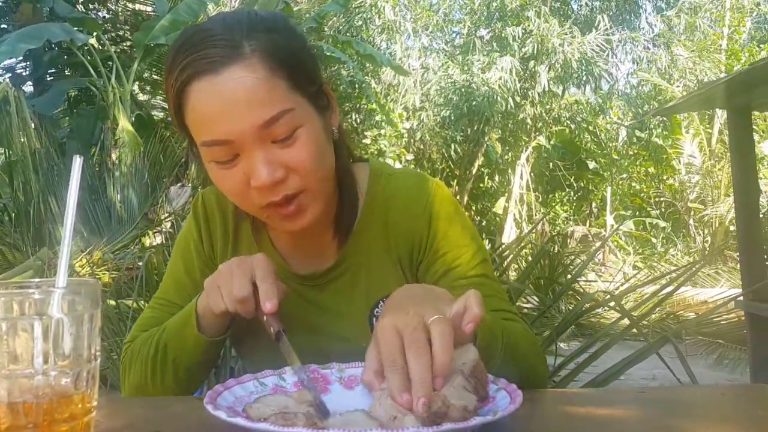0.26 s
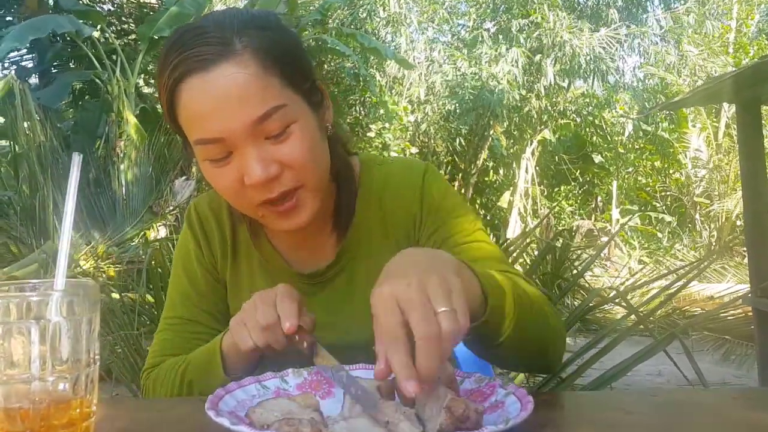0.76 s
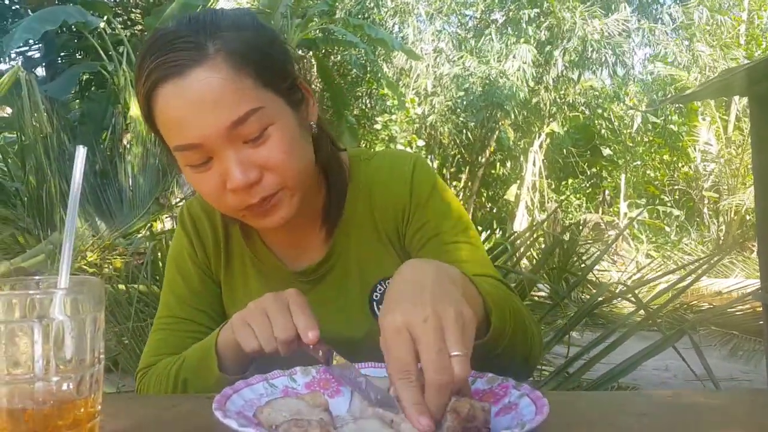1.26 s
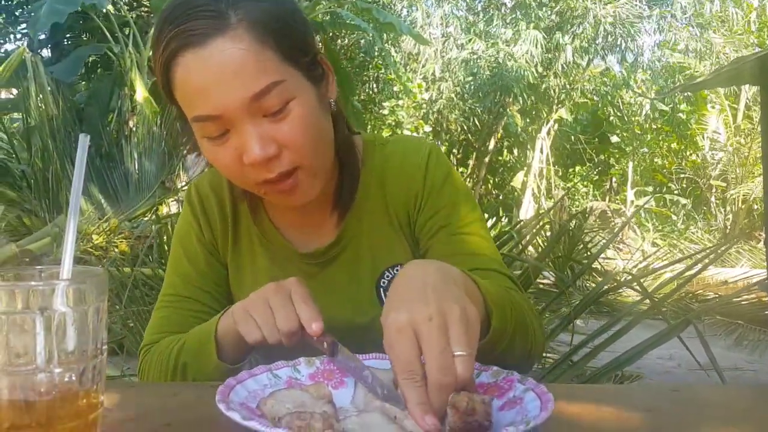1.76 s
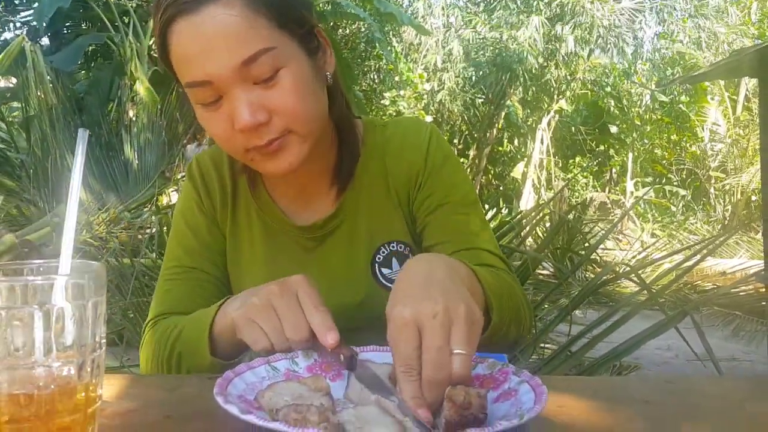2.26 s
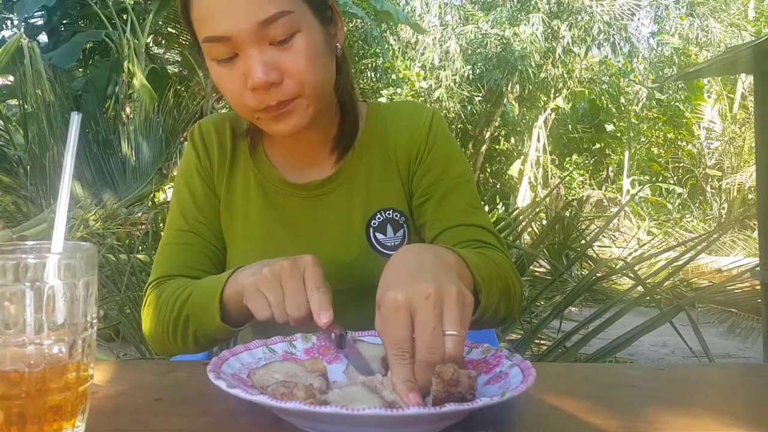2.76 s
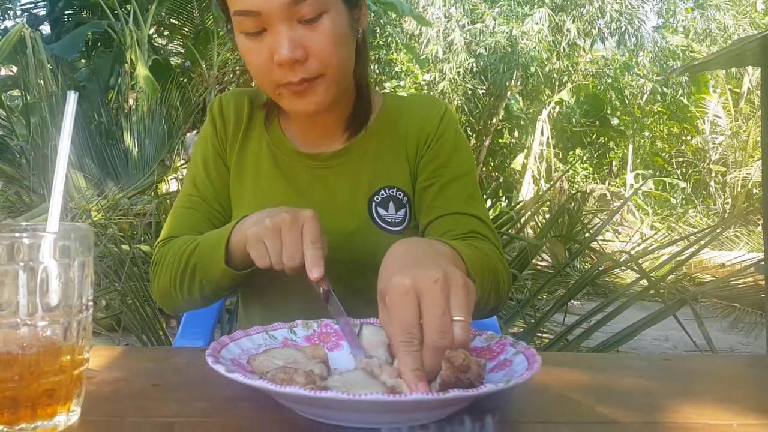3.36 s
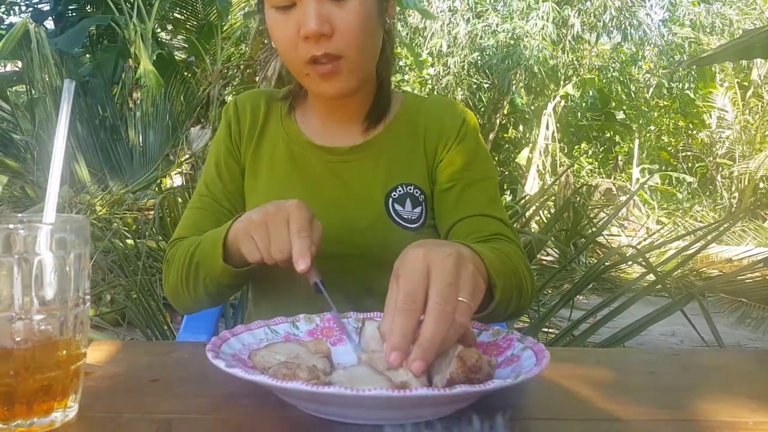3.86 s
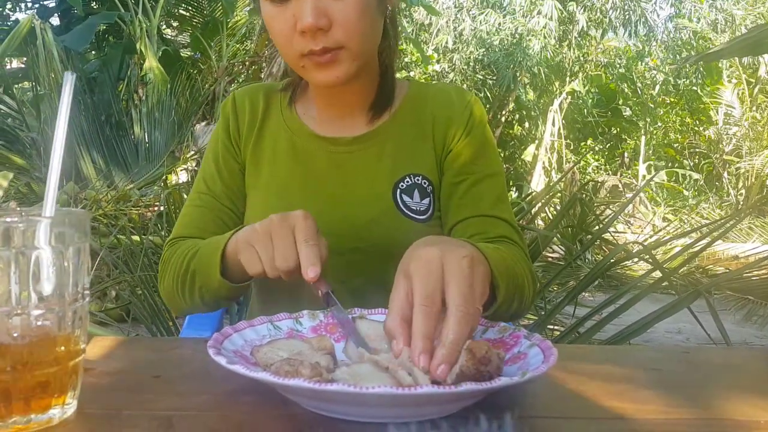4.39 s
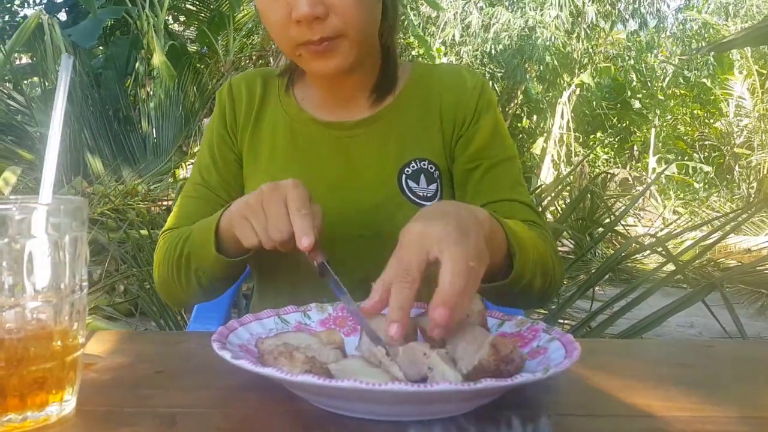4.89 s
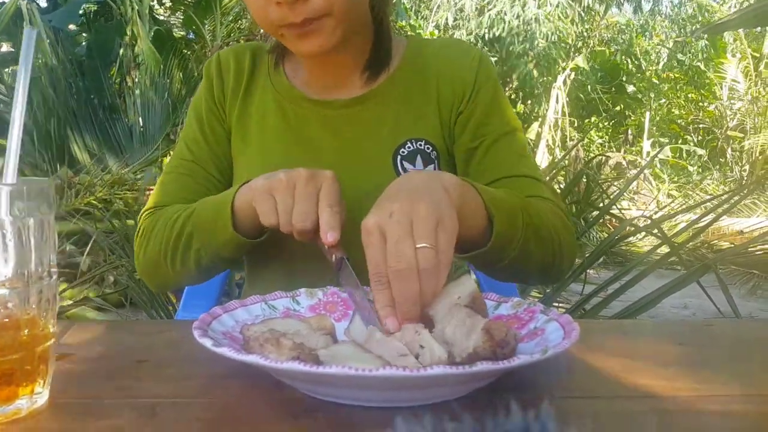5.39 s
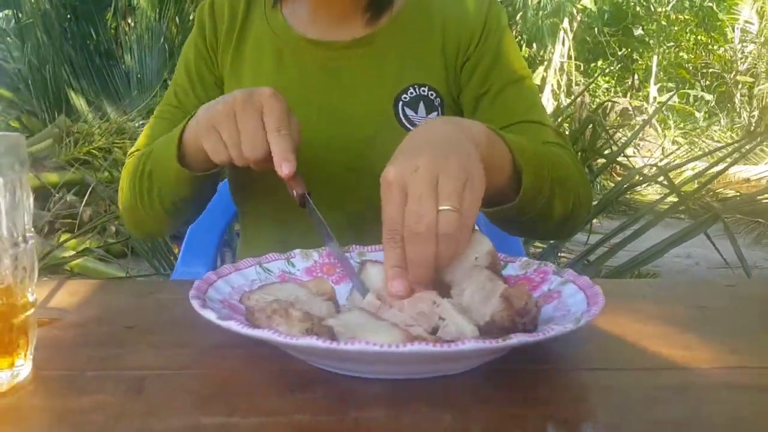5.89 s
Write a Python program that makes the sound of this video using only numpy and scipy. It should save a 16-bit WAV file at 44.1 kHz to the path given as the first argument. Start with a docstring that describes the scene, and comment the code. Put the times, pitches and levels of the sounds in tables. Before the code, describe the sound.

A table knife clicks and scrapes on a plate while cutting meat, the plate knocking on a wooden table in a quiet garden.

```python
"""A steady hush of leaves and far-off noise in a garden; then, close by, a table knife saws through
cooked meat on a light plate. The blade ticks on the plate, and each blow knocks the plate against the
wooden table. Between blows the serrated edge scrapes the glaze and the plate rumbles.
A stereo microphone near the table picks it up, with two short echoes from nearby surfaces."""
import sys
import numpy as np
from scipy import signal
from scipy.fft import rfft, irfft, next_fast_len
from scipy.io import wavfile

SR = 44100
rng = np.random.default_rng(int(sys.argv[2]) if len(sys.argv) > 2 else 0)


def inscribe(sig):
    """Save sig as 16-bit PCM at rate SR to the path in sys.argv[1].

    A 1-D sig is mono; a 2-D sig holds one channel per row.
    Samples are clipped to [-1, 1] before scaling.
    """
    pcm = np.round(np.clip(np.atleast_2d(sig).T, -1, 1) * 32767)
    wavfile.write(sys.argv[1], SR, pcm.astype(np.int16))


N = 270862

# Spectrum of the leaves and far-off noise: frequency_hz, relative_density_db
GARDEN_SPECTRUM = [(25, -28), (60, -1), (97, -3.5), (250, -5.5), (600, -8), (1600, -14.5), (3400, -20),
                   (4300, -25), (5200, -42), (7000, -36), (10000, -36), (12000, -33), (13500, -44.5),
                   (15000, -58.5), (16000, -75)]
# How alike the garden is on left and right: frequency_hz, correlation
GARDEN_LIKENESS = [(60, 1), (180, 1.0), (550, 0.99), (1650, 0.99), (4970, 0.98), (15000, 0.89)]
# Strokes of the edge across the glaze: start_s, length_s, scrape_start_db, scrape_end_db,
# treble_share_db, shake_start_db, shake_end_db, knock_over_rocking_db
STROKES = [(0.08, 0.074, -61, -62, -24, -70, -66, 12), (0.387, 0.045, -37.5, -40.5, -17.5, -25, -32.5, 1),
           (0.43, 0.11, -50, -67.5, -22, -41, -54, -3.5), (2.428, 0.049, -46, -54, -20, -42, -41, 9),
           (2.627, 0.021, -43.5, -40, -25.5, -30, -22, -9), (2.74, 0.062, -36, -75, -23, -25, -38.5, -6),
           (2.827, 0.035, -50.5, -47.5, -21.5, -18, -45, -5.5),
           (2.873, 0.04, -43.5, -55, -19.5, -25, -36.5, -3.5), (2.915, 0.02, -62, -72, -31, -38.5, -40, -9),
           (3.109, 0.048, -51, -55, -19.5, -39, -78, -5), (3.297, 0.081, -59, -55.5, -20, -48, -42, -4.5),
           (3.384, 0.042, -55, -58, -21, -33, -43.5, -7), (3.428, 0.058, -54, -49, -21, -46, -38, -10),
           (3.501, 0.1, -47, -62.5, -20.5, -42, -47.5, -1), (4.509, 0.031, -53, -55, -14, -56, -59, -19),
           (4.565, 0.025, -46.5, -60.5, -20, -41, -50, -11), (4.6, 0.012, -66, -78, -9, -52, -57, -20),
           (4.641, 0.076, -60.5, -63, -28, -67.5, -65, 13), (5.376, 0.022, -53, -55, -21, -49, -50, 1),
           (5.417, 0.065, -55.5, -55, -15, -47, -38.5, -5.5), (5.542, 0.12, -63, -49, -14.5, -47, -50, -25),
           (5.682, 0.09, -49.5, -48.5, -18.5, -36, -49, -22), (5.768, 0.04, -48, -58, -23, -23, -49, -18),
           (5.812, 0.032, -55.5, -48, -22.5, -30.5, -28.5, -9),
           (5.911, 0.028, -62.5, -66.5, -20, -33, -44, -12),
           (5.953, 0.038, -57, -47, -20, -42.5, -44.5, -8.5)]
# Pressure of the cut through the meat, heard as rumble and rub: time_s, level_db
CUT_PRESSURE = [(0.361, -80), (0.45, -57.5), (0.62, -75), (2.0, -87), (2.158, -56), (2.57, -51.5),
                (2.8, -45.5), (3.1, -49.5), (3.46, -51.5), (3.62, -60), (4.06, -60.5), (4.25, -85),
                (4.45, -66), (4.839, -59), (4.97, -88), (5.301, -73), (5.54, -47), (5.79, -47.5),
                (5.919, -60), (6.0, -56.5), (6.14, -62.5)]
# Plate ringing under the edge: pitch_hz, level_db, t60_s
RIM_MODES = [(915, -7.5, 0.02), (1100, -6.5, 0.028), (1338.6, -1, 0.014), (1639, 0.5, 0.018),
             (1823, -1.5, 0.022), (2146, -3.5, 0.016), (2579, -8.5, 0.024), (3120, -6, 0.016),
             (3463, -6, 0.014), (3925, -16, 0.019)]
# The blade's own ring: pitch_hz, level_db, t60_s
BLADE_MODES = [(4830, 0.5, 0.012), (5850, -4, .012), (7200, -4.5, .008), (8450, -2, .008),
               (9530, -1.5, .007), (11360, -1, .006), (12600, -5, 0.006)]
# Plate rocking on the table; neighbours start opposed and swell as they beat: pitch_hz, level_db, t60_s
ROCKING_MODES = [(357.6, -1, 0.1), (384, 2, 0.16), (414.8, 2, 0.1), (445.2, -1, 0.089)]
# Plate knocking on the table: pitch_hz, level_db, t60_s
KNOCK_MODES = [(199.4, -14.5, 0.15), (505, -3, 0.064), (567.4, -6.5, 0.17), (613.3, 1.5, 0.044),
               (653, 5, 0.041), (791, -11.5, .07)]
# Thud of the wooden table top: pitch_hz, level_db, t60_s
TABLE_MODES = [(93, -7.5, 0.28), (118.2, -3, 0.1), (160, -3.5, 0.053), (297, -0.5, 0.06)]
# Blade meets plate: start_s, tick_peak_db, blade_peak_db, rocking_db, knock_db, thud_db,
# tick_centre_hz, chatter_ms, off_centre_loss_db
BLOWS = [(0.3655, -4, -19, -44, -16.5, -41, 2146, 7.2, 5.5),
         (0.3695, -13, -42, -51, -19.5, -30, 2146, 5, 16),
         (0.3745, -9, -42.5, -26, -18, -50, 2146, 3.3, 21),
         (0.434, -45, -39.5, -40, -57, -55, 2150, 6.1, 18),
         (1.074, -48, -74.5, -90.5, -80, -66.5, 1446, 5.5, 19),
         (1.2653, -40, -82.5, -29, -29.5, -44.5, 1230, 5.4, 5),
         (1.3286, -58.5, -79.5, -34, -38.5, -52, 1550, 4.8, 9.5),
         (1.8208, -40.5, -55, -89.5, -78.5, -78.5, 3164, 4, 16.5),
         (1.836, -50, -60, -86, -72, -68.5, 1640, 3.7, 0.5),
         (2.33, -72, -52.5, -50, -49, -51.5, 1310, 5.0, 1),
         (2.398, -40.5, -42, -41.5, -49, -52, 3120, 2.6, 10),
         (2.4264, -14, -45, -26, -20.5, -33, 2260, 5.2, 18), (2.6205, -56, -64, -45, -36, -60, 1790, 6, 7),
         (2.7252, -16, -39.5, -22.5, -22, -54, 1837, 3.9, 2.5),
         (2.7313, -22, -55, -30.5, -25, -27, 2055, 8.5, 14),
         (2.8439, -36, -50, -30.5, -23, -51, 1640, 3.4, -2),
         (3.088, -15, -41.5, -41.5, -34, -61, 1880, 0.92, 7.5),
         (3.2772, -43.5, -60, -73, -75, -74, 2890, 5.2, 13),
         (3.3536, -23.5, -47, -25.5, -29.5, -69, 2620, 2.1, 0),
         (3.3653, -27, -50, -38.5, -37, -56, 1450, 5.9, 2.5),
         (3.4908, -30.5, -58, -30, -32, -63, 1484, 5.5, -3),
         (3.7542, -40, -80, -31, -46, -45, 1480, 6.4, -2.5),
         (3.798, -41.5, -73, -36.5, -37, -51, 1670, 7.1, 5),
         (3.8871, -29.5, -50, -37.5, -37, -74, 2348, 9.1, 7),
         (3.984, -68, -54, -77, -75.5, -56.5, 1457, 1.5, 14.5),
         (4.5025, -36, -67, -65, -54.5, -72, 2027, 4.0, 18),
         (4.508, -36.5, -51, -48, -70, -54, 2020, 4.9, 12.5),
         (4.5156, -34, -58, -53, -72, -65, 2230, 2.1, 5), (4.5322, -36, -60, -61, -50, -68, 2700, 3.0, 8.5),
         (4.5362, -35, -58, -43.5, -59, -59, 2300, 3.4, 6),
         (4.5573, -38, -59, -43.5, -56, -66, 1960, 7.3, 4),
         (4.6684, -46.5, -67, -75, -65, -86, 1620, 13, 15),
         (5.3615, -34.5, -68, -38, -50, -70, 1910, 3.3, 2.5),
         (5.755, -22.5, -50.5, -26, -27, -74, 1400, 7.9, 7.5),
         (5.8294, -31, -60.5, -20, -29, -31.5, 1254, 2.9, 3),
         (5.8568, -55.5, -67, -28, -58, -34.5, 1140, 5.0, 19),
         (5.891, -37.5, -56, -26.5, -43.5, -61, 1920, 3.6, 5)]
# Echoes from surfaces near the table: delay_s, level_db
ECHOES = [(.003, -20), (.008, -19)]
# Level between the microphone's two ports: frequency_hz, left_minus_right_db
PORT_BALANCE = [(125, 0), (500, -.6), (1200, -.1), (2500, -.3), (3500, -3), (5000, -9.5), (6500, -5),
                (9000, 5.5), (12000, 1)]
# Phase between the ports: frequency_hz, left_lead_rad
PORT_PHASE = [(3000, -0.022), (4500, 0.11), (6000, .1), (7500, -.1), (10000, .05)]

GARDEN_RMS_DB = -61
BITE_DB_PER_S, RELEASE_DB_PER_S = 1499, 899
RUB_DB, RUB_FOLLOWS, RUB_TREBLE_DB = -61, 0.75, -19  # rub at -50 dB pressure; share of swing; blade's part
JOLT_DB, PRESS_KNOCK_DB, TABLE_SHARE_DB = -31, -6, -3.5  # jolts; knock over rocking; table over knock
HELD_RING, FAVOURED_RING = .5, 1.3  # ring time factors: under the edge; a tick's centre mode
CHATTER_FORCE, TICK_SPREAD_OCT, TICK_DULL_DB_PER_OCT = 0.15, 0.22, 2.5
SCRAPE_LOW_CUT_HZ = 860  # the held plate gives little of its low modes
OVERLOAD_LEVEL, LOW_CUT_HZ, TOP_CUT_HZ = .8, 45, 16400


def from_db(db):
    """Gain of a level in dB."""
    return 10 ** (np.asarray(db) / 20)


def rms_one(x):
    """Scaled to rms 1."""
    return x / np.sqrt(np.mean(x ** 2) + 1e-20)


def at_hz(points, hz):
    """A spectrum table read on a log-frequency axis."""
    table_hz, values = np.transpose(points)
    return np.interp(np.log(hz), np.log(table_hz), values)


def filtered(x, order, hz, kind):
    """Butterworth filter."""
    return signal.sosfilt(signal.butter(order, hz, kind, fs=SR, output="sos"), x)


def drift(rate_hz):
    """Slow noise of spread 1."""
    pole = np.exp(-80 * np.pi * rate_hz / SR)
    slow = signal.lfilter([1], [1, -2 * pole, pole * pole], rng.standard_normal(N // 40 + 2002))[2000:]
    return np.interp(np.arange(N) / 40, np.arange(len(slow)), rms_one(slow))


def grit(per_s, spread_db):
    """Random clicks of uneven size; rms 1."""
    sizes = from_db(spread_db * np.minimum(rng.exponential(1, N), 5)) * rng.choice([-1, 1], N)
    return rms_one(sizes * (rng.random(N) < per_s / SR))


def ring(force, hz, t60):
    """One mode: a unit click starts a dying sine of height 1."""
    decay, angle = from_db(-60 / (t60 * SR)), 2 * np.pi * hz / SR
    return signal.lfilter([0, np.sin(angle)], [1, -2 * decay * np.cos(angle), decay ** 2], force + 1e-18)


def body(force, modes):
    """All modes of one body, neighbours in opposite sign."""
    return sum((-1) ** k * from_db(db) * ring(force, hz, t60) for k, (hz, db, t60) in enumerate(modes))


def garden(flicker_db):
    """Leaves and far-off noise: third-octave bands of stereo noise, each flickering in level."""
    out, shared_drift = 0, drift(1.5)
    edges_hz = 25 * 2 ** np.arange(0, 9.5, 1 / 3)
    white = rng.standard_normal((2, 2, N))
    for k, (low, high) in enumerate(zip(edges_hz, edges_hz[1:])):
        mid, side = filtered(white[k % 2], 2, [low, high], "band")
        hz = np.sqrt(low * high)
        alike = at_hz(GARDEN_LIKENESS, hz)
        gain = from_db(at_hz(GARDEN_SPECTRUM, hz) + flicker_db * (0.6 * shared_drift + drift(7.9)))
        out = out + gain * (np.sqrt(1 + alike) * mid + np.sqrt(1 - alike) * side * [[1], [-1]])
    return from_db(GARDEN_RMS_DB) * rms_one(out)


def stroke_gain(start_db, end_db):
    """Every stroke bites, slides from one level to another and lets go; strokes add."""
    t, total = np.arange(N) / SR, 0
    for (start, length, *_), first_db, last_db in zip(STROKES, start_db, end_db):
        slide_db = np.interp(t, [start, start + length], [first_db, last_db])
        bite_db = BITE_DB_PER_S * np.maximum(start - t, 0)
        release_db = RELEASE_DB_PER_S * np.maximum(t - start - length, 0)
        total = total + from_db(slide_db - np.minimum(bite_db + release_db, 200))
    return total


def dragged(force, modes, wander_db=1.6):
    """Grit into damped modes whose strengths wander as the edge travels."""
    return rms_one(sum((-1) ** k * from_db(db + wander_db * drift(11.0)) * ring(force, hz, HELD_RING * t60)
                       for k, (hz, db, t60) in enumerate(modes)))


def edge_scrape(pressure_db):
    """The serrated edge scrapes and softly rubs: one rough contact drives both plate and blade."""
    start_db, end_db, treble_db = np.transpose(STROKES)[2:5]
    scrape = stroke_gain(start_db, end_db)
    treble = stroke_gain(start_db + treble_db, end_db + treble_db)
    rub = from_db(RUB_DB + RUB_FOLLOWS * (pressure_db + 50))
    teeth = grit(4000.0, spread_db=2.0) * from_db(2.2 * drift(40.0))
    rasp = rms_one(filtered(dragged(teeth, RIM_MODES), 1, SCRAPE_LOW_CUT_HZ, "high"))
    blade = dragged(teeth, BLADE_MODES)
    return np.hypot(scrape, rub) * rasp + np.hypot(treble, from_db(RUB_TREBLE_DB) * rub) * blade


def plate_rumble(pressure_db):
    """The uneven push of the sawing shakes the plate on the table."""
    start_db, end_db, knock_db = np.transpose(STROKES)[5:]
    jolts = from_db(JOLT_DB) * grit(600.0, spread_db=1.5)
    tip = jolts * np.hypot(stroke_gain(start_db, end_db), from_db(pressure_db))
    knocking = stroke_gain(start_db + knock_db, end_db + knock_db)
    push = jolts * np.hypot(knocking, from_db(pressure_db + PRESS_KNOCK_DB))
    plate = body(tip, ROCKING_MODES) + body(push, KNOCK_MODES)
    table = from_db(TABLE_SHARE_DB) * body(push, TABLE_MODES)
    return filtered(plate + table, 2, 70.0, "high")  # the rumble is thinned below about 70 Hz


def blade_ticks():
    """Each blow, a click and a short chatter, rings the blade and the plate modes near its centre."""
    out, rough, span = np.zeros(N), grit(2987.0, spread_db=2.0), SR // 10
    age_ms = np.arange(span) / SR * 1000
    rim_hz, rim_db, rim_t60 = np.transpose(RIM_MODES)
    for start, tick_db, blade_db, *_, centre_hz, chatter_ms, off_centre_db in BLOWS:
        at = round(start * SR)
        force = CHATTER_FORCE * rough[at:at + span] * np.exp(-(age_ms / chatter_ms) ** 4)
        force[0] = 2  # the first click
        octaves = np.log2(rim_hz / centre_hz)
        octaves -= octaves[np.argmin(np.abs(octaves))]  # the grip bends the nearest mode to the centre
        favoured = np.exp(-(octaves / TICK_SPREAD_OCT) ** 2)
        # a flat contact loses the modes above the centre faster
        loss_db = off_centre_db * (1 - favoured) + TICK_DULL_DB_PER_OCT * np.maximum(octaves, 0)
        mode_db = rim_db + rng.normal(0, 1.5, len(rim_db)) - loss_db
        t60 = rim_t60 * np.where(octaves == 0, FAVOURED_RING, 1)
        plate_modes = zip(centre_hz * 2 ** octaves, mode_db, t60)
        for peak_db, modes in ((tick_db, plate_modes), (blade_db, BLADE_MODES)):
            sound = body(force, modes)
            out[at:at + span] += from_db(peak_db) * sound / np.abs(sound).max()
    return out


def plate_knocks():
    """The same blows push the plate against the table through a soft contact; it tips a moment later."""
    start_s, _, _, rocking_db, knock_db, thud_db, *_ = np.transpose(BLOWS)
    out = 0
    for blow_db, modes, lag_s, spread_db in ((rocking_db, ROCKING_MODES, 0.004, 2.1),
                                             (knock_db, KNOCK_MODES, 0.00053, 2.1),
                                             (thud_db, TABLE_MODES, 0.0017, 1.6)):
        onsets = np.round((start_s + lag_s) * SR).astype(int)
        scatter_db = rng.normal(0, spread_db, (len(BLOWS), len(modes)))  # no two blows land alike
        for k, (hz, db, t60) in enumerate(modes):
            push = np.zeros(N)
            push[onsets] = from_db(blow_db + db + scatter_db[:, k])
            out = out + (-1) ** k * ring(push, hz, t60)
    return filtered(out, 3, [65.0, 1500.0], "band")


def scene():
    """Knife and plate up close, with two dull echoes and the garden behind."""
    pressure_db = np.interp(np.arange(N) / SR, *np.transpose(CUT_PRESSURE))
    close = blade_ticks() + plate_knocks() + plate_rumble(pressure_db) + edge_scrape(pressure_db)
    dull = signal.lfilter([.4], [1, -.6], close)
    echoes = sum(from_db(db) * np.roll(dull, round(delay_s * SR)) for delay_s, db in ECHOES)
    return close + echoes + garden(flicker_db=1.2)


def record(dry):
    """The microphone's two ports differ in level and phase. Peaks are rounded and deep bass thinned."""
    size = next_fast_len(N + SR // 10)
    hz = np.maximum(np.arange(size // 2 + 1) * SR / size, 1)
    left = from_db(at_hz(PORT_BALANCE, hz) / 2) * np.exp(.5j * at_hz(PORT_PHASE, hz))
    ports = irfft(rfft(dry, size) * [left, 1 / left], size)[:, :N]
    rounded = OVERLOAD_LEVEL * np.tanh(ports / OVERLOAD_LEVEL)
    top_cut = signal.cheby2(12, 70, TOP_CUT_HZ, fs=SR, output="sos")  # the highest treble is cut off
    return signal.sosfilt(top_cut, filtered(rounded, 1, LOW_CUT_HZ, "high"))


dry = scene()
out = record(dry)
inscribe(out)
```